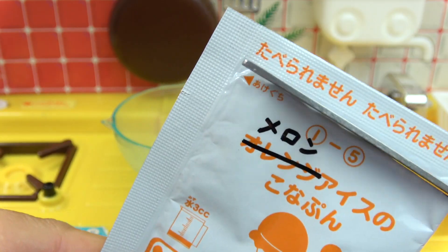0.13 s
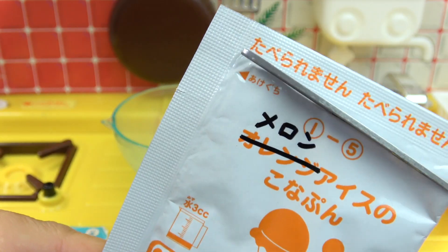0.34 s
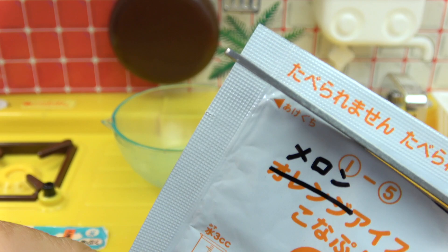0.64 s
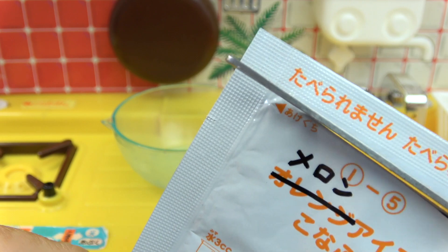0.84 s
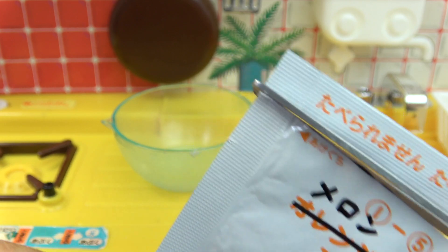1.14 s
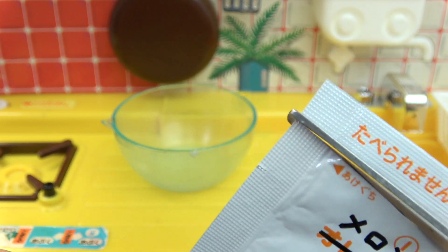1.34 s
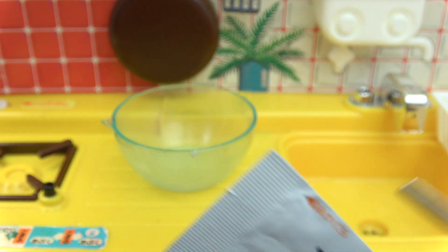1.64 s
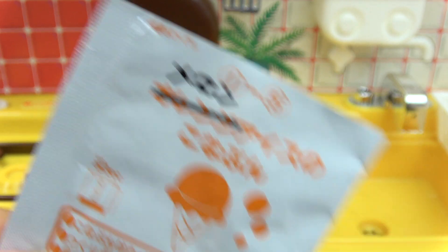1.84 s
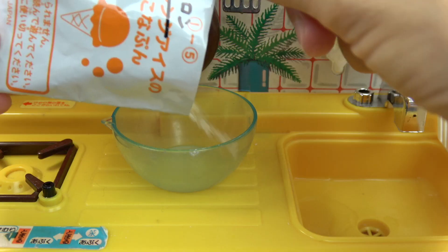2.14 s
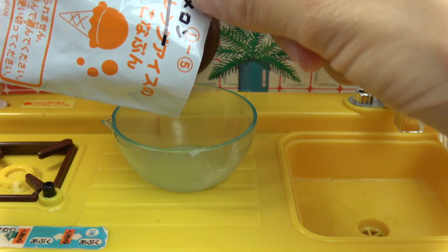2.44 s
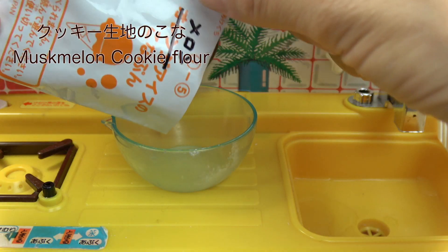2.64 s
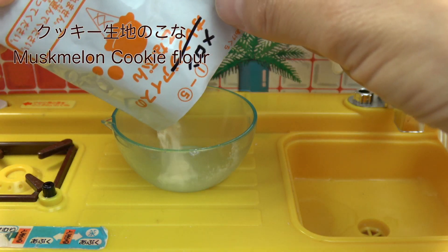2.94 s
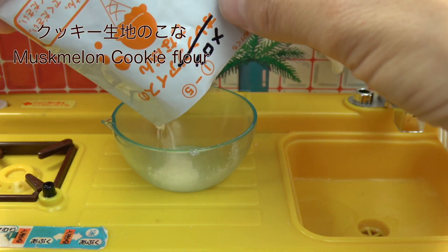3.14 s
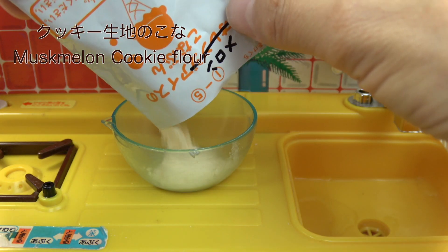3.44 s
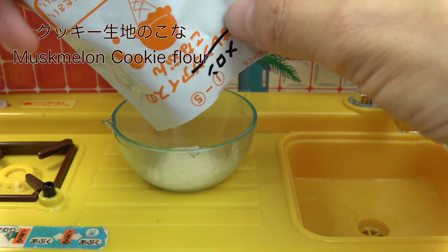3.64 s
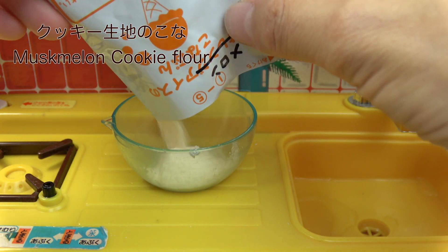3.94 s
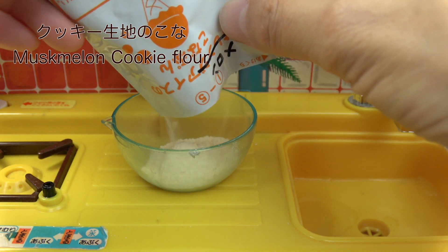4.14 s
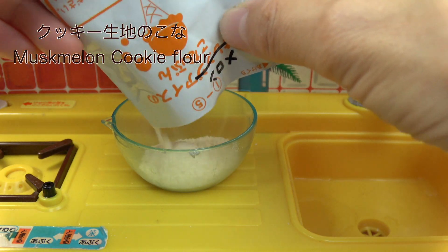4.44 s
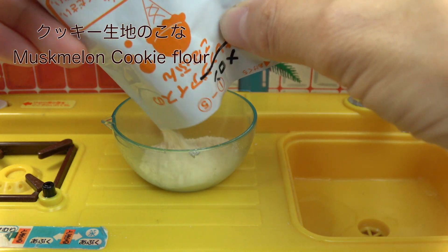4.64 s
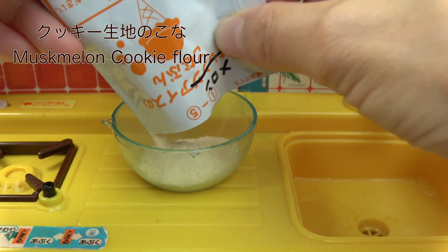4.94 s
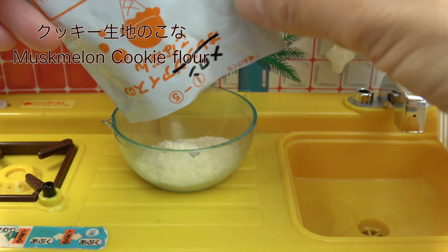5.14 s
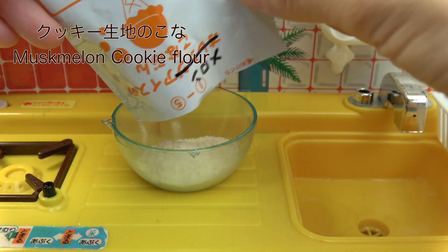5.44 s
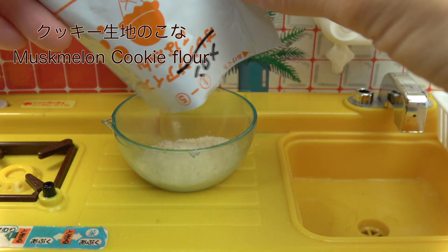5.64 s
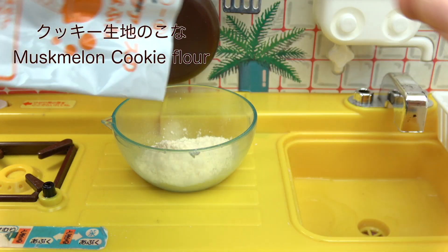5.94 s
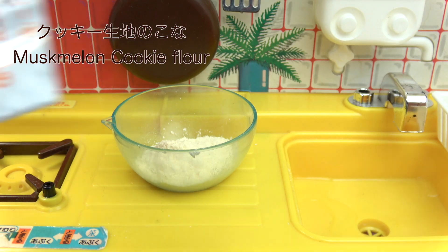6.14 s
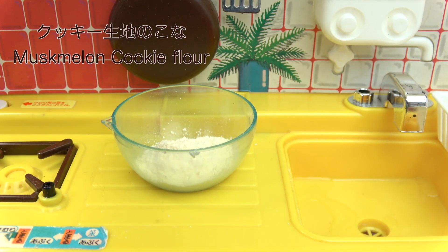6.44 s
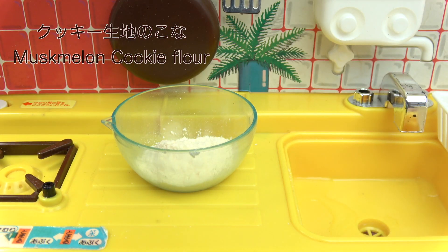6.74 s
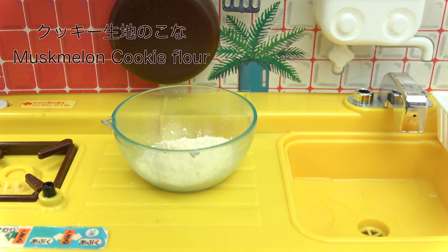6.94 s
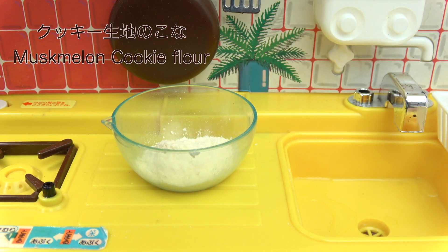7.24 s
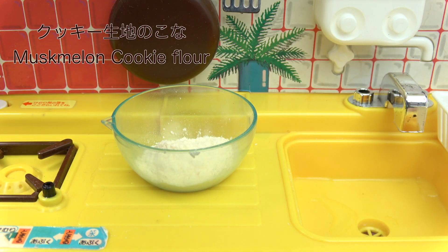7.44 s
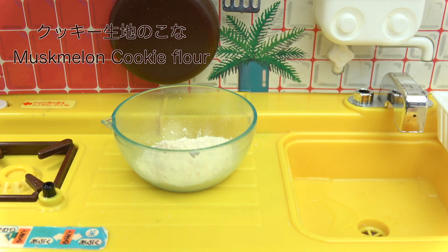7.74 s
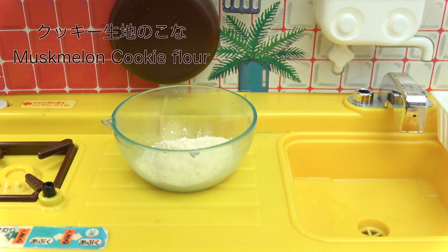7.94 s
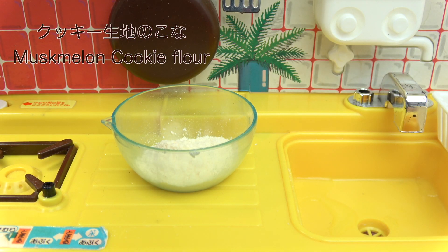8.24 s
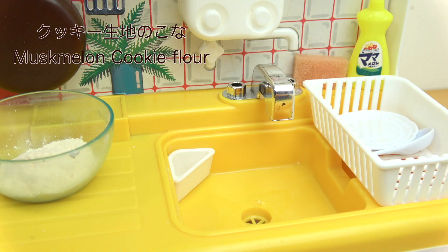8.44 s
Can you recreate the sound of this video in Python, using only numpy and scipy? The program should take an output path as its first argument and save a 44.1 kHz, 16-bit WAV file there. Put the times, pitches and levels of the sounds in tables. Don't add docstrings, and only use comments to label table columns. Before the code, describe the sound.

A foil-lined plastic sachet is snipped open with crisp crackles, tipped and kneaded so powder hisses out, then the empty packet crinkles away into quiet.

```python
import sys
import numpy as np
from scipy import signal
from scipy.fft import rfft, irfft, next_fast_len
from scipy.io import wavfile
from scipy.ndimage import uniform_filter1d

SR = 44100
rng = np.random.default_rng(int(sys.argv[2]) if len(sys.argv) > 2 else 0)


def dump_mix(stems):
    frames = np.atleast_2d(stems).T
    limited = np.clip(frames, -1, 1)
    pcm = np.round(limited * 32767).astype(np.int16)
    wavfile.write(sys.argv[1], SR, pcm)


def convert_level_to_amplitude(level_db):
    exponent = np.asarray(level_db, float) / 20
    return 10 ** exponent


N = 378907

HISS_TOP_HZ = 15750
BLADES_END_S, PUT_DOWN_S = 1.75, 8

# time in seconds, peak level in dB, pitch in Hz.
PANELS = [(0.409, -17, 3350), (0.9268, -22, 3450), (0.9667, -14, 3260), (1.1353, -13, 7900),
          (1.4132, -27, 9300), (1.4536, 1, 7970), (1.6222, -22, 2320), (3.1388, -2, 4830),
          (3.2331, -15, 3370), (3.4765, -13, 2850), (3.9599, -1, 3960), (4.2088, -24, 3140),
          (4.3191, -9.5, 3300), (4.4997, -33, 2920), (4.5545, -12, 3260), (4.7666, -11.5, 3280),
          (4.8454, -18, 2900), (4.9182, -27, 3250), (5.0544, -16, 3030), (5.2739, -15, 3380),
          (5.3547, -18.5, 6300), (5.7154, -15, 3240), (5.7423, -8.5, 4230), (5.9773, -19, 4440),
          (6.4727, -17, 6060), (6.8728, -17, 5400)]


def evened(x):
    return x / np.sqrt(np.mean(x ** 2) + 1e-20)


def loudest(x):
    return np.sqrt(uniform_filter1d(x ** 2, size=80).max())


def read(points, hz):
    f, value = np.transpose(points)
    return np.interp(np.log(hz + 1), np.log(f + 1), value)


def add(mix, s, sound):
    part = mix[max(round(s * SR), 0):][:len(sound)]
    part += sound[:len(part)]


def hiss():
    hiss_db = -71
    size = next_fast_len(N)
    in_band = np.fft.rfftfreq(size, 1 / SR) < HISS_TOP_HZ
    spectrum = rfft(rng.standard_normal((2, size))) * in_band
    mid, side = convert_level_to_amplitude(hiss_db) * irfft(spectrum, size)[:, :N]
    return mid + 0.3 * side * np.array([[1], [-1]])


def air():
    # frequency in Hz, likeness as a ratio.
    likeness = [(30, .55), (100, 0.91), (400, 0.98), (1000, 1)]
    # frequency in Hz, density in dB per Hz.
    tone_colour = [(20, -13.5), (50, -13.5), (75, -9), (95, -1), (125, -10), (220, -7.5), (450, -10.5),
                   (1000, -16), (1350, -25), (3000, -28.5), (9000, -42.5)]
    air_db, patchy_db = -62.5, 2.0
    calm_db = -2.5
    frames, hz = N // 512 + 5, np.fft.rfftfreq(2048, 1 / SR)
    a, b, c, d, patches = rng.standard_normal((frames, 1025, 5)).T
    patches = uniform_filter1d(patches, size=12, axis=0)
    patches = evened(uniform_filter1d(patches, size=8, axis=1))
    apart = np.sqrt((1 - np.clip(read(likeness, hz), -1, 1)) / 2)[:, None]
    mid = np.sqrt(1 - apart ** 2) * (a + 1j * b)
    side = apart * (c + 1j * d)
    z = np.array([mid + side, mid - side]) * convert_level_to_amplitude(read(tone_colour, hz)[:, None] + patchy_db * patches)
    tone = signal.istft(z, nperseg=2048, noverlap=1536)[1][:, :N]
    calm = convert_level_to_amplitude(calm_db * np.clip((np.arange(N) / SR - PUT_DOWN_S) / 0.12 + 1, 0, 1))
    return convert_level_to_amplitude(air_db) * calm * evened(tone)


def room(x):
    # frequency in Hz, decay by 60 dB in seconds.
    decay = [(300, 0.068), (1500, 0.13), (5000, 0.074), (14000, 0.05)]
    taps = np.zeros(SR // 2)
    at = np.arange(120, SR // 2 - 20, 20)
    taps[at + rng.integers(0, 20, len(at))] = rng.choice([-1., 1.], len(at))
    hz, t, z = signal.stft(taps, SR, nperseg=256)
    z = z * convert_level_to_amplitude(-60 * t / read(decay, hz)[:, None])
    tail = signal.istft(z, SR, nperseg=256)[1]
    return signal.oaconvolve(x, tail / np.linalg.norm(tail))[:N]


def bumps():
    # time in seconds, peak level in dB, pitch in Hz.
    pushes = [(0.255, -55, 408), (0.56, -49, 94), (0.949, -48, 245), (1.039, -52, 88), (1.61, -51, 101),
              (3.017, -50.5, 358), (4.198, -48, 340), (5.198, -56, 60), (5.437, -49, 237),
              (5.734, -53, 274), (5.848, -34.5, 858), (5.86, -47, 83), (6.04, -54, 131), (6.455, -47, 99),
              (6.622, -46, 67), (6.659, -53, 217), (7.646, -58, 156.4)]
    out, t = np.zeros(N), np.arange(6000) / SR
    for s, db, hz in pushes:
        swell = 1 - np.exp(-t / 0.0058)
        decay = np.exp(-t / 0.018 * (1 + hz / 1500))
        add(out, s, convert_level_to_amplitude(db + 5.5) * swell * decay * np.sin(2 * np.pi * hz * t))
    return out


def rubbing(t):
    # peak time in seconds, length in seconds, swish level in dB, pouch share in dB.
    blade_strokes = [(0.0, 0.063, -57.5, -0.5), (.21, 0.048, -48, -12), (.262, 0.062, -41.5, 0),
                     (.3, 0.042, -51, -1), (.43, 0.097, -59.5, -2), (.53, 0.036, -49.5, -3),
                     (.567, 0.06, -39.5, -7), (.61, .04, -56, 7), (.635, 0.014, -54, 1.5),
                     (.833, 0.19, -56.5, -1), (.998, 0.13, -49, -2), (1.1, 0.18, -58, -2),
                     (1.316, 0.033, -61.5, -1), (1.487, 0.12, -46.5, -7.5), (1.671, 0.087, -50, -5.5)]
    # peak time in seconds, length in seconds, swish level in dB,
    # pouch share in dB.
    finger_strokes = [(2.2, 0.036, -54, -18), (2.245, 0.043, -56, -6.5), (3.9, .05, -58, -20),
                      (2.45, 0.085, -61, -4), (2.54, 0.09, -59, 0), (2.61, 0.017, -48.5, -4.5),
                      (3.18, 0.081, -60.5, -5), (4.006, 0.13, -47.5, -20), (4.176, 0.032, -52.5, -6),
                      (4.35, 0.24, -56, -19), (4.66, 0.18, -56, -7.5), (4.959, 0.18, -60, 1.5),
                      (5.143, 0.05, -58.5, 7), (5.234, 0.012, -49.5, -9), (5.288, 0.1, -77, 24),
                      (5.448, 0.072, -55.5, 2), (5.627, 0.086, -62, 4), (5.767, 0.089, -55.5, -10)]
    # peak time in seconds, length in seconds, swish level in dB,
    # pouch share in dB.
    empty_strokes = [(5.861, 0.023, -40.5, -3.5), (6.03, 0.063, -47.5, 0), (6.01, 0.032, -52, 9.5),
                     (6.05, 0.021, -51, -6), (6.1, 0.21, -47.5, -13), (6.2, 0.1, -51, -22),
                     (6.31, 0.17, -54, -13), (6.51, 0.11, -49.5, -7.5), (6.66, 0.056, -51, 1),
                     (6.735, 0.04, -43.5, -8.5), (6.78, 0.038, -48, -14), (6.9, 0.14, -51, -8),
                     (7.04, 0.078, -53, -28), (7.085, 0.03, -46, -19), (7.15, 0.27, -65, -2.5),
                     (7.268, .1, -69, 13), (7.66, .05, -73, 6), (8.146, .08, -60.5, -2)]
    # time in seconds, flow level in dB.
    pour = [(2.7, -84.5), (2.85, -68), (2.95, -61), (3.1, -61), (3.28, -61), (3.38, -57), (3.53, -57),
            (3.6, -71), (3.67, -65), (3.72, -69), (3.85, -70), (4.1, -60), (5.8, -75.5)]
    pour_share_db = np.array([[-13.5], [-3.5], [0]])
    held_db, lying_db = -72.5, -77
    fall_db, tail = 24.5, 1.36

    flow_db = np.interp(t, *np.transpose(pour), left=-120, right=-120)
    power = convert_level_to_amplitude(2 * (flow_db + pour_share_db))
    stir_db = np.where(t < PUT_DOWN_S, held_db, lying_db)
    power = power + convert_level_to_amplitude(2 * (stir_db + np.array([[0], [-4], [-4]])))
    for strokes, sheet_db in ((blade_strokes, -1.5), (finger_strokes, 6), (empty_strokes, 0)):
        for s, length, db, pouch_db in strokes:
            away = np.maximum(s - t, (t - s) / tail) / length
            share_db = np.array([[pouch_db], [pouch_db / 2 + sheet_db], [0]])
            power = power + convert_level_to_amplitude(2 * (db - fall_db * away + share_db))
    return power


def rustle(per_s=4000, spread_db=-0.5, smooth=1.0, bunch_db=1.0, patchy_db=1.8):
    # frequency in Hz, density in dB per Hz.
    pouch_colour = [(250, -18.5), (600, -3), (850, -5.5), (1000, -5.5), (1200, -5.5), (1450, -13.5),
                    (1800, -17), (3000, -38.5)]
    # frequency in Hz, density in dB per Hz.
    sheet_colour = [(1200, -15.5), (2100, -5), (3100, -3.5), (4200, -4.5), (6000, -29.5)]
    # frequency in Hz, density in dB per Hz.
    swish_colour = [(3000, -28.5), (4800, 0), (8500, -0.5), (10500, -8), (12500, -15), (15700, -24.5)]
    # frequency in Hz, gain in dB.
    blade_gain = [(6000, 1), (9400, 5), (11000, 5.5), (15700, 3.5)]

    grains = convert_level_to_amplitude(spread_db * np.minimum(rng.exponential(1, N), 5)) * (rng.random(N) < per_s / SR)
    drive = evened(grains * rng.standard_normal(N)) + smooth * rng.standard_normal(N)
    bunches = evened(uniform_filter1d(rng.standard_normal(N), size=500))
    drive *= convert_level_to_amplitude(bunch_db * bunches)
    s = np.arange(N // 64 + 5) * 64 / SR
    levels = rubbing(s)

    hz, t, z = signal.stft(evened(drive), SR, nperseg=256, noverlap=192)
    patches = rng.standard_normal(z.shape[::-1]).T
    patches = uniform_filter1d(patches, size=4, axis=0)
    patches = evened(uniform_filter1d(patches, size=40, axis=1))
    blades_db = read(blade_gain, hz)[:, None] * (t < BLADES_END_S)
    power = 0
    for level, points, extra_db in zip(levels, (pouch_colour, sheet_colour, swish_colour), (0, 0, blades_db)):
        colour = convert_level_to_amplitude(read(points, hz)[:, None] + extra_db)
        power = power + np.interp(t, s, level) * colour ** 2 / (colour ** 2).mean(0)
    z *= np.sqrt(power) * convert_level_to_amplitude(patchy_db * patches) * (hz < HISS_TOP_HZ)[:, None]
    return signal.istft(z, SR, nperseg=256, noverlap=192)[1][:N]


def ring(modes, chance, detune, uneven_db, start_ms=0.15, size=700):
    hz, db, t60 = np.repeat(modes, repeats=5, axis=0).T[:, :, None]
    t = np.arange(size) / SR
    shift, weight, phase = chance[:, :len(hz), None]
    spread = np.arange(len(hz))[:, None] % 5 - 2 + 0.4 * shift
    bent_hz = np.minimum(hz * (1 + detune * spread), 16000)
    tones = np.sin(np.float32(2 * np.pi * (bent_hz * t + 0.48 * phase)))
    decay = np.exp(np.float32(-np.log(1000) * t / t60))
    x = (convert_level_to_amplitude(db + uneven_db * weight) * decay * tones).sum(0)
    x *= (1 - np.exp(-t * 1000 / start_ms)) ** 2
    return x / np.linalg.norm(x)


def panels():
    share_db, t60 = -12.5, 0.006
    out, chance = np.zeros(N), rng.standard_normal((len(PANELS), 3, 5))
    for (s, db, hz), c in zip(PANELS, chance):
        tones = ring([(hz, 0, t60)], c, 0.033, 1.5)
        add(out, s + 0.00066, convert_level_to_amplitude(db + share_db) * tones / loudest(tones))
    return out


def snaps(slip_ms=0.81, after_db=-14, panel_db=1.5, panel_t60=0.0089, thin_hz=250):
    # frequency in Hz, level in dB, decay by 60 dB in seconds.
    pouch_modes = [(289.5, -13, 0.036), (581.7, -7, 0.032), (845.4, 3, 0.025), (1070.4, 2, 0.023),
                   (1262, 1.5, 0.022), (1627, -7.5, 0.035)]
    # frequency in Hz, level in dB, decay by 60 dB in seconds.
    sheet_modes = [(2167, 0, 0.013), (2780, -3, 0.016), (3380, 2.5, 0.014), (4210, -1.5, 0.014),
                   (4840, 1.5, 0.014), (5440, -5, 0.013), (6250, 1, .011)]
    # frequency in Hz, level in dB, decay by 60 dB in seconds.
    crease_modes = [(7180, 3, 0.016), (8550, 3, 0.013), (9720, -2.5, 0.011), (10960, -8, 0.0093),
                    (12600, -6.5, 0.015), (14200, -7.5, 0.007)]
    # time in seconds, peak level in dB, pouch share in dB, sizzle share in dB.
    cutting = [(.0715, -47.5, 12, -8), (.1798, -37.5, -9, 1), (.2057, -45, -14, 15), (.2552, -38, -11, 0),
               (.261, -28.5, 2, 5), (.2694, -30.5, 12, -12), (.2854, -26.5, 8, -6.5),
               (.3485, -36.5, -1.5, -30), (.4085, -25, -4.5, -5), (.4503, -37.5, 0.5, -18),
               (.7193, -42.5, -1, 4), (.749, -40.5, -5, 1.5), (.784, -39.5, 1.5, 4.5), (.8, -43, -22, 4),
               (.8227, -36.5, -24, -3.5), (.8335, -40.5, -24, -3), (.8841, -40.5, -10, -3),
               (.9278, -25.5, -7, -6), (.9675, -20, -2, -7), (1.0162, -38, -14, -2.5),
               (1.0542, -43, -10, -1), (1.0672, -41, -13, 21), (1.0749, -46, -8, -7),
               (1.0993, -38.5, -9, 17), (1.111, -37, 1, -7), (1.1215, -42, -30, -5),
               (1.1359, -24.5, -7, -3.5), (1.168, -42.5, 8, -8)]
    # time in seconds, peak level in dB, # pouch
    # share in dB, sizzle share in dB.
    tipping = [(1.305, -45.5, -3, -2), (1.367, -40, -20, 4.5), (1.4159, -34, -8, 5), (1.422, -33.5, 3, 0.5),
               (1.4545, -13, -5.5, 6.5), (1.505, -25.5, -10, -2), (1.5114, -30, -8, -4.5),
               (1.6238, -30, -7, -6), (1.6382, -24, -13.5, -2), (1.6658, -36.5, -35, 0.5),
               (1.776, -41, 3, -17), (1.993, -36.5, -4.5, -15.5), (2.1853, -38.5, -21, -8.5),
               (2.197, -30, -1, -30), (2.4263, -51, -1, -8), (2.552, -30.5, 4.5, -31), (2.619, -40, -7, -5),
               (3.1396, -15.5, -14, -5.5), (3.1722, -43, -5, -13.5), (3.2342, -22.5, -7.5, -5),
               (3.455, -48, 1, -18), (3.4777, -19.5, -13.5, -16), (3.95, -42, 15.5, -13.5),
               (3.9608, -12.5, -9, -9), (4.016, -39, 16, -13.5), (4.022, -35.5, -4, -25.5),
               (4.0513, -31, -10.5, -22)]
    # time in seconds, peak level in dB, pouch share in dB,
    # sizzle share in dB.
    kneading = [(4.2098, -21.5, -11.5, -5), (4.228, -30, -10, -26), (4.2328, -27, -2, -18),
                (4.2453, -29.5, 9, -16), (4.3199, -30.5, -3.5, -29), (4.336, -33, -6, -18),
                (4.3538, -36, -10, -16), (4.364, -38.5, -1, -22), (4.44, -39, 6, -18),
                (4.476, -37, 1.5, -28), (4.5, -26, -6.5, -26), (4.509, -40, 15, -22),
                (4.556, -28.5, -1, -21), (4.589, -32, -11, -17), (4.627, -34.5, 4, -6),
                (4.647, -25.5, -23, -24), (4.659, -24.5, -7, -28), (4.6675, -32.5, 9, -35),
                (4.7674, -28, 0, -41), (4.7875, -40, 27, -9), (4.8341, -34, 14, -21),
                (4.846, -24.5, -6.5, -24), (4.8571, -27, -7, -13), (4.9198, -28, -6.5, -18),
                (4.939, -30, -1, -24), (4.98, -43, 11, -14), (5.003, -44, 9, -26), (5.016, -37.5, 26, -20),
                (5.022, -33.5, 24, -18), (5.055, -24.5, -11, -5.5)]
    # time in seconds, peak level in dB, pouch share in dB,
    # sizzle share in dB.
    shaking = [(5.115, -29, -16, -17), (5.1318, -29, 1.5, -20), (5.237, -43, -4, 0.5),
               (5.272, -33.5, -2, -10), (5.2763, -33, 1, -25), (5.2995, -32, 0, -21), (5.31, -34, -7, -26),
               (5.3196, -23, -2.5, -10), (5.3558, -27, -13.5, -12), (5.435, -28.5, -9, -16),
               (5.45, -34.5, 3, -22), (5.4558, -34, 0, -9.5), (5.5336, -32, 12, -15),
               (5.5503, -26.5, -15, -12), (5.62, -40, -5, -6.5), (5.6392, -37, -1.5, -27),
               (5.6785, -37, 0.5, -37), (5.717, -15, -20.5, -8), (5.7274, -29, -14, -8),
               (5.7432, -16, -10.5, -6), (5.7836, -43, -5, -3)]
    # time in seconds, peak level in dB, pouch share in dB,
    # sizzle share in dB.
    leaving = [(5.952, -45, 4, -15), (5.978, -22.5, -15.5, -20), (6.0172, -21.5, -9, -5),
               (6.0366, -27, -4, -3), (6.0702, -26.5, -0.5, -9), (6.1187, -26.5, -7, -24),
               (6.137, -35, -7, -11), (6.148, -26.5, -14, -28), (6.274, -46, 6, -1),
               (6.2912, -40.5, 6, -19), (6.3799, -39.5, -6.5, -4), (6.473, -30.5, -10.5, 3.5),
               (6.4885, -27.5, -15, -3), (6.57, -35, -12, -21), (6.6467, -39, 8, -18),
               (6.6603, -32, -15, 3.5), (6.697, -36.5, -12, -4), (6.7279, -36, -11, -10.5),
               (6.8741, -28, -22, 4.5), (7.1915, -48.5, -5, -3), (7.276, -52, -3, -3.5)]
    # time in seconds, peak level in dB, # pouch share in
    # dB, sizzle share in dB.
    further_snaps = [(0.145, -58, -20, 8), (0.165, -53, -20, 2), (0.1737, -51, -20, 4), (.7262, -49, -10, 3),
                     (.7775, -53, -17, 8), (0.7965, -48, -18, -3), (.8155, -49, -20, -1), (0.8275, -40, -20, 6),
                     (.852, -46, -2, -8), (0.872, -46, -13, 3), (.8905, -44, -13, 2), (0.913, -41, 3, -3),
                     (.921, -44, -3, 2), (.9705, -20.5, -7, -0.5), (0.9719, -29, -4, 2), (.992, -45, -5, 0),
                     (1.0245, -44, -2, 1), (1.0615, -44, -12, 1), (1.078, -42, -4, -5), (1.1045, -36, -8, -1),
                     (1.1831, -43, 1, -9), (1.4246, -42, -11, 5), (1.4524, -25.5, -15, 4), (2.787, -57, -1.5, -6),
                     (2.803, -53.5, -1, -2), (4.4628, -43, 4, -20), (4.489, -47, -1, -20), (4.9623, -42, 6, -12),
                     (5.1085, -39, -6, -18), (5.162, -45, 12, -24), (5.417, -47, 15, -10), (5.4314, -31.5, -5, -10),
                     (5.4925, -45, -4, -2.5), (5.9137, -51, -3, -4.5), (5.967, -43, 9, -15),
                     (6.0127, -32, -12, -4.5), (6.0425, -34, 5, 0), (6.0475, -37, -5, -4), (6.2577, -48, -2, -7),
                     (6.282, -57, -20, 3), (6.2865, -42, 10, -15), (6.448, -53, -12, -4), (6.639, -51, -12, -4),
                     (6.847, -48.5, -1, -5.5), (7.088, -50, -18, -3), (7.1564, -53, -10, -4),
                     (7.2218, -53, -11, -5), (7.237, -59, -17, -1), (7.257, -57, 6, -9)]
    slack_hz, tight_hz = 3156, 8160
    tight_db, tight_span_db = -2, 2
    open_s, open_db = 1.7, -7

    rows = cutting + tipping + kneading + shaking + leaving + further_snaps
    out, t, clear_s = np.zeros(N), np.arange(400) / SR, np.transpose(PANELS)[0]
    chance = rng.standard_normal((len(rows), 4, 3, 35))
    slips = rng.standard_normal((len(rows), 400))
    for (s, db, pouch_db, sizzle_db), c, slip in zip(rows, chance, slips):
        frayed = s < BLADES_END_S and db < -31
        drive = slip ** 3 * np.exp(-t * 1000 / (slip_ms * (1 + 5 * frayed)))
        drive *= convert_level_to_amplitude(after_db) * 3 / np.linalg.norm(drive)
        drive[0] = 1

        pouch = ring(pouch_modes, c[0], 0.029, 3.9, start_ms=0.098, size=1200)
        sheet = ring(sheet_modes, c[1], 0.031, 1.2)
        if abs(clear_s - s).min() > 1 / 250:
            tightness = 1 / (0.5 + np.exp((tight_db - sizzle_db) / tight_span_db))
            hz = slack_hz + (tight_hz - slack_hz) * tightness
            sheet = sheet + convert_level_to_amplitude(panel_db) * ring([(hz, 0, panel_t60)], c[3], 0.048, 1.3)
        creases = [(f, g + open_db * (s > open_s and f > 12000), t60) for f, g, t60 in crease_modes]
        sizzle = ring(creases, c[2], 0.036, 0.82, size=400)

        snap = 0
        for share_db, part in ((pouch_db, pouch), (0, sheet), (sizzle_db, sizzle)):
            struck = np.pad(signal.fftconvolve(drive, part), (0, len(pouch) - len(part)))
            snap = snap + convert_level_to_amplitude(share_db) * struck / loudest(struck)
        add(out, s - 0.0005, convert_level_to_amplitude(db) * snap / loudest(snap))
    return signal.sosfilt(signal.butter(2, thin_hz, "high", fs=SR, output="sos"), out)


def scene():
    cracks = snaps() + panels()
    sachet = cracks + rustle()
    slope = np.roll(cracks, shift=-1) - np.roll(cracks, shift=1)
    apart = convert_level_to_amplitude(-30) * np.array([[1], [-1]]) * slope
    return sachet + apart + convert_level_to_amplitude(-16.5) * room(sachet) + bumps() + air()


def roll_off(x):
    return signal.sosfilt(signal.butter(12, 16840, fs=SR, output="sos"), x)


def record(dry):
    top_db = -26
    size = next_fast_len(N)
    above = np.clip((np.fft.rfftfreq(size, 1 / SR) - HISS_TOP_HZ) / 150, 0, 1)
    mix = irfft(rfft(dry + hiss(), size) * convert_level_to_amplitude(top_db * above), size)[:, :N]
    return roll_off(mix)


dry = scene()
out = record(dry)
dump_mix(out)
```